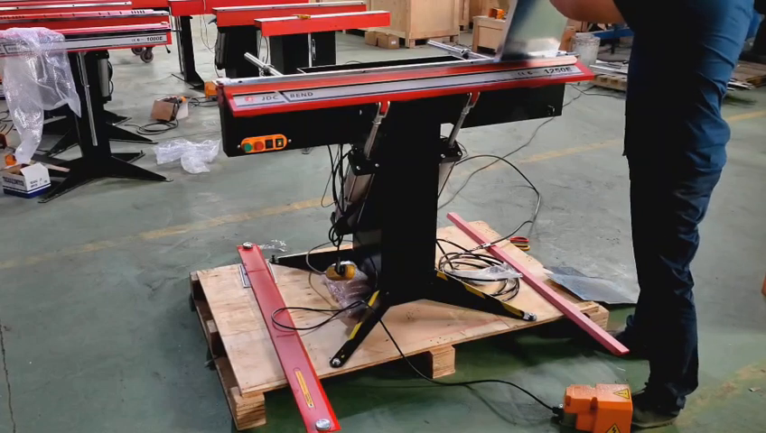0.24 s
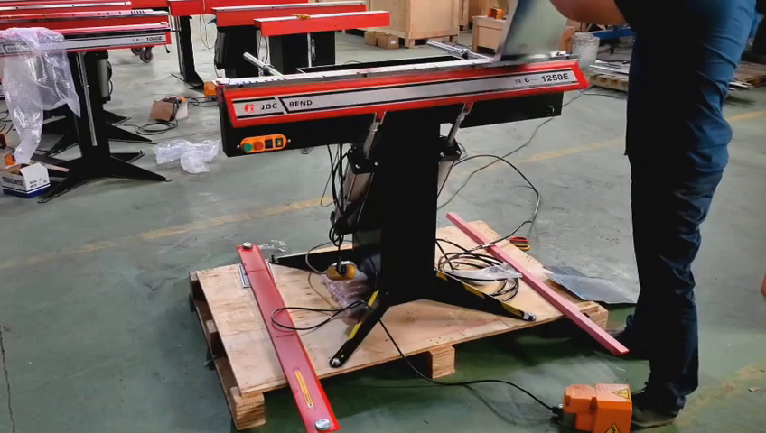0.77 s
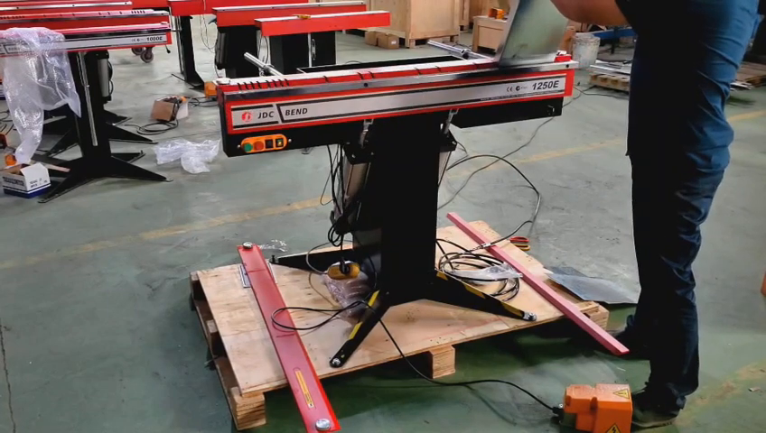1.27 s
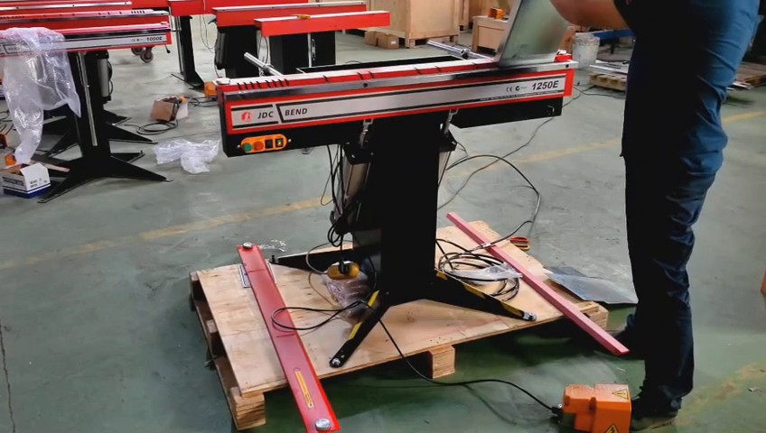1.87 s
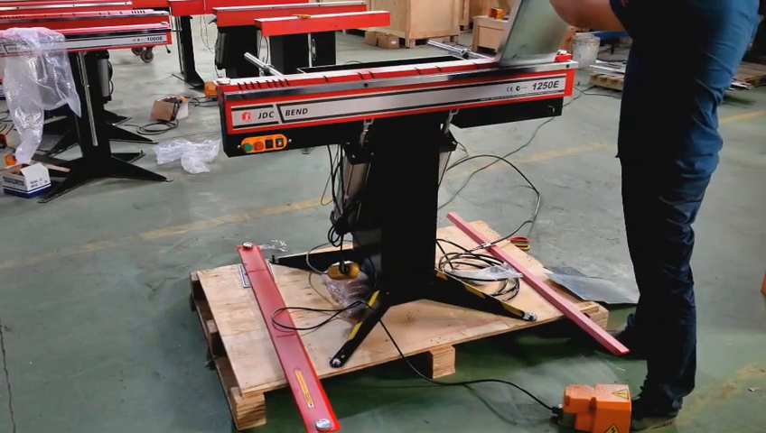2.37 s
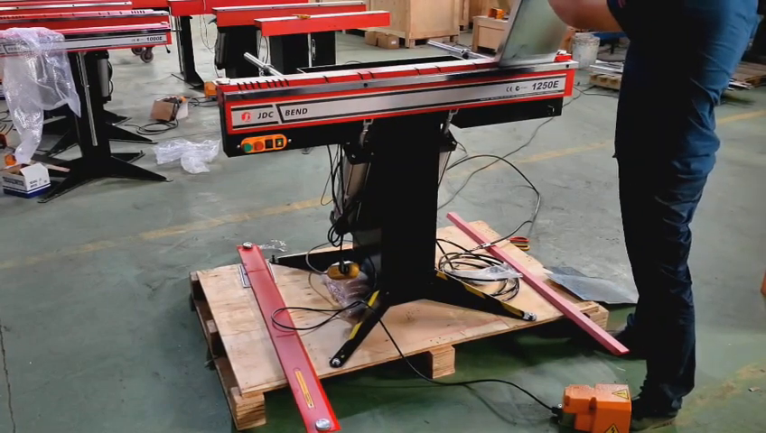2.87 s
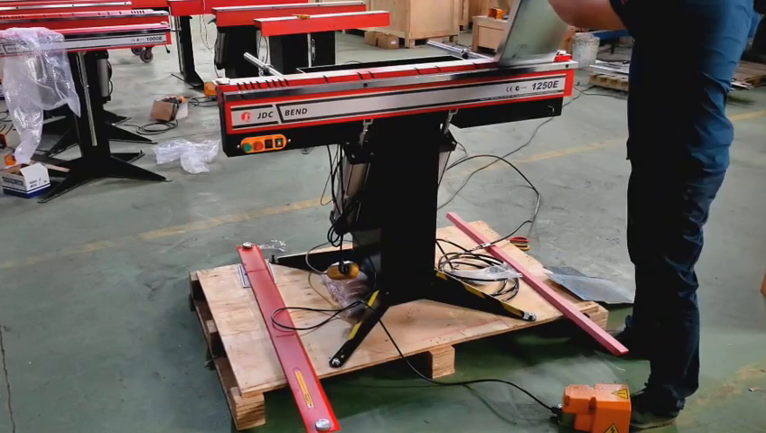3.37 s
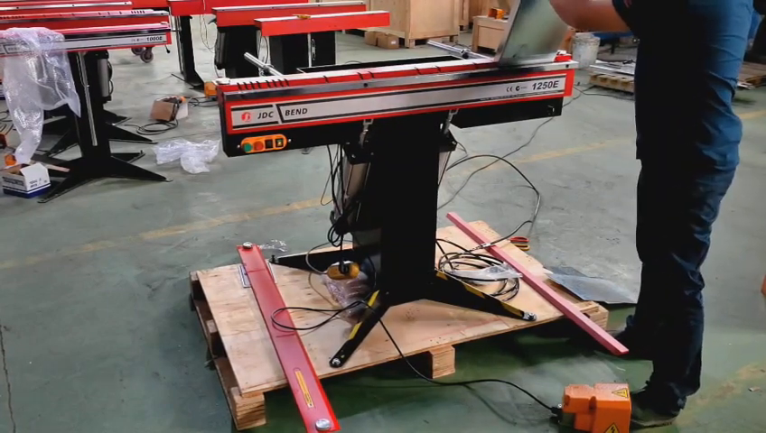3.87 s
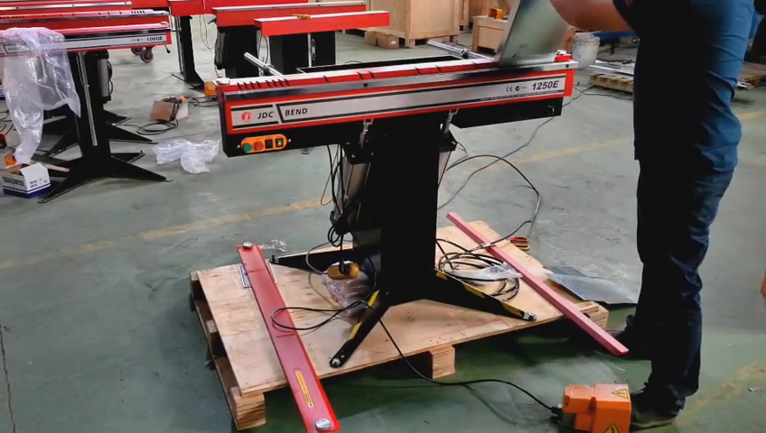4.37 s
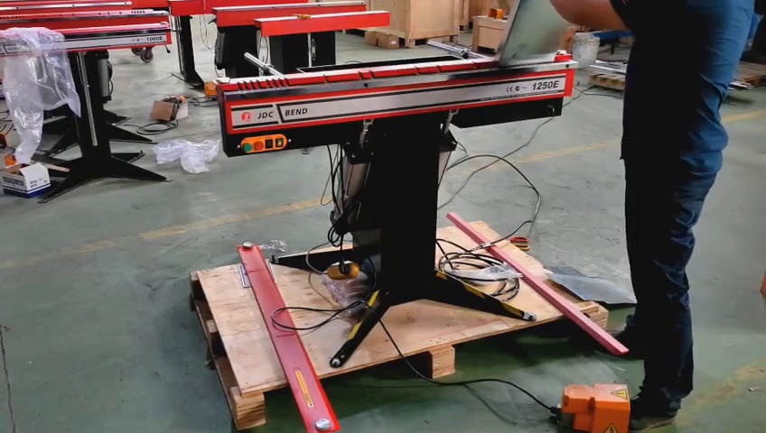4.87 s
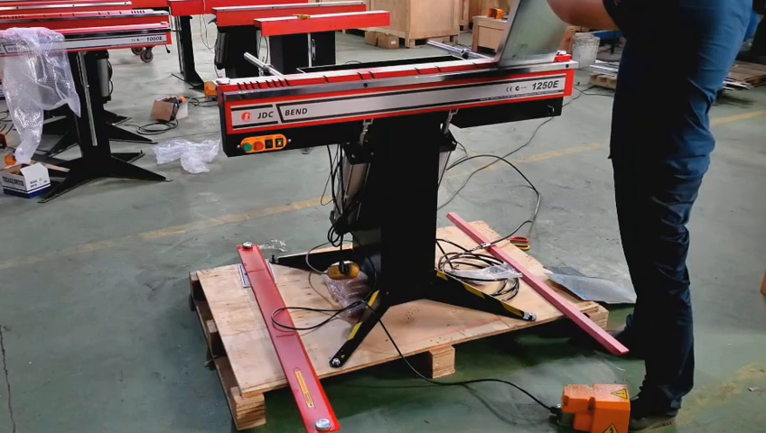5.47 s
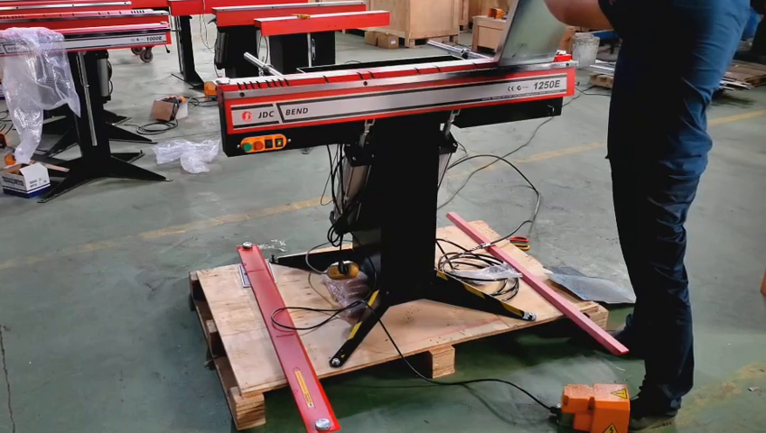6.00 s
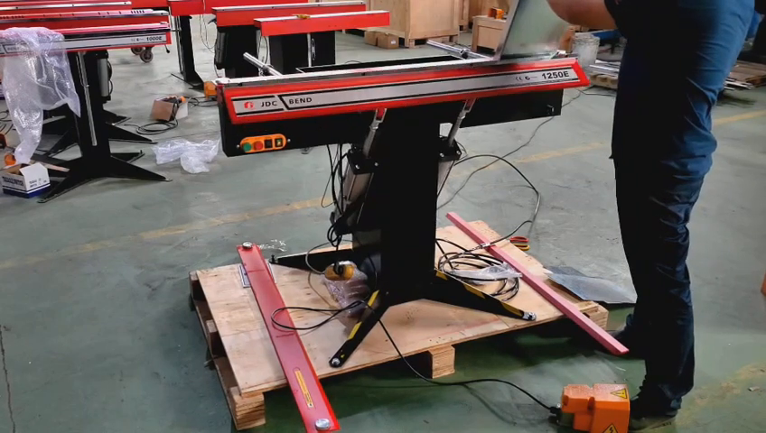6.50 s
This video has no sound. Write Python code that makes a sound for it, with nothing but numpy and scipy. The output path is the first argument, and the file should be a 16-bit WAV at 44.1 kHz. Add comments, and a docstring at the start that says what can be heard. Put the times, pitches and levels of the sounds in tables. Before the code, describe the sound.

A pneumatic sheet metal folder in a large factory hall. A thin, high whistle gives way to a strong air blast, ending in a crunching steel clank. A distant machine drones briefly, then a hard clang and click. Later, latches tick, the clamp slams with several ringing knocks, and a weaker air rush fades among low thumps. The microphone hears it from a few metres away, with low hall rumble.

```python
"""Air-driven sheet metal brake

In a factory hall, air rushes out as the folding leaf drops onto its stop; the clamp lifts, the sheet
is shifted, the clamp slams shut, and air rushes again as the leaf swings up. A far machine drones briefly.
Jets, leaks and the hall are shaped noise; hum, drone and valve whistle are wavering sines; struck steel
is a filtered noise burst with decaying modes and the note of the part struck."""
import sys
import numpy as np
from scipy import signal
from scipy.fft import rfft, irfft
from scipy.io import wavfile
from scipy.ndimage import uniform_filter1d

SR = 44100
rng = np.random.default_rng(int(sys.argv[2]) if len(sys.argv) > 2 else 0)


def inscribe(sig):
    """Save sig as 16-bit PCM at rate SR to the path in sys.argv[1].

    A 1-D sig is mono; a 2-D sig holds one channel per row.
    Samples are clipped to [-1, 1] before scaling.
    """
    pcm = np.round(np.clip(np.atleast_2d(sig).T, -1, 1) * 32767)
    wavfile.write(sys.argv[1], SR, pcm.astype(np.int16))


N = 297410  # samples

# Background noise of the hall: f/Hz, relative level/dB per Hz
HALL_NOISE = [(25, -20.5), (50, -1), (75, -6.5), (160, -3), (260, -9.5), (550, -11), (870, -13.5),
              (1300, -25.5), (2300, -29), (5000, -28), (7000, -33.5), (9500, -49), (13000, -53.5)]
# Course of the hall's hiss: t/s, relative level/dB
HISS_COURSE = [(.2, 3.5), (1.7, -3), (2.25, -10), (2.85, -9), (3.1, -12)]
# Hum in the hall: f/Hz, mean level/dB
HUM_TONES = [(49.9, -67.5), (79, -74), (315, -73.5), (555, -90.5)]
# Partials of the far machine: harmonic number, mean level/dB
DRONE_PARTIALS = [(1, -71), (2, -61.5), (3, -60), (4, -71), (6, -79)]
# Colour of air seeping through the valve: f/Hz, relative level/dB per Hz
SEEP_SPECTRUM = [(3000, -35), (9500, -26), (10500, -7), (11400, -3), (12500, -4), (13800, -7.5)]
# Leaks while the valve holds pressure: start t/s, length/s, level/dB, fading/(dB/s), negative if growing
VALVE_LEAKS = [(0, 0.39, -79, -10), (1.103, 0.36, -71, -3), (3.597, 1, -66.5, 11)]
# Spits of the switching valve: t/s, level/dB
VALVE_SPITS = [(1.458, -58), (3.595, -39.5), (4.58, -56)]
# Venting of the cylinder, once a stroke: start t/s, travel/s, flow level/dB, sag in travel/(dB/s),
# release after it/(dB/s), fizz lost/dB per dB of flow lost, port whistle level/dB
VENT_STROKES = [(0.297, 0.69, -29.5, 14.5, 70, 0.6, 9), (5.494, .57, -35.5, 5, 28.5, 0.54, 4)]
# Colour of the exhaust jet: f/Hz, relative level/dB per Hz
JET_SPECTRUM = [(350, -8), (700, -14), (1300, -8.5), (1800, -11.5), (2600, -4.5), (3600, -4), (5000, -5.5),
                (7500, -7), (8200, -12.5), (9700, -15), (11500, -9), (14000, -14.5)]
# Corners of the force spectrum, from thud through body and clank to crack: f/Hz
FORCE_CORNERS = [140, 300, 750, 1150, 1700, 2500]
# Modes of the frame and sheet: f/Hz, relative level/dB, t60/s at a ring length factor of 1
BRAKE_MODES = [(125.8, -11, 0.17), (148.3, 0.5, 0.39), (171.5, -9, 0.73), (252.7, -12, 0.48),
               (303.3, -8, 0.86), (425, -6.5, 0.61), (455, -11.5, 1), (504, -2, 0.68), (688, -2.5, 0.55),
               (793, -3.5, 0.5), (950, -19, 0.1), (1216, -3.5, 0.33), (1321, -2, 0.43), (1460, -4.5, 0.22),
               (1590, -5.5, 0.15)]
# Dense rattle between those modes: f/Hz, relative level/dB per Hz
RATTLE_SPECTRUM = [(50, -26), (85, -22.5), (135, -6.5), (220, -7.5), (450, -7.5), (900, -7.5), (1450, -11),
                   (1950, -21.5), (2600, -17.5), (4200, -19.5), (7200, -29), (9600, -38.5), (11300, -28.5),
                   (14000, -52.5)]
# Bright resonances of the clamp bar: f/Hz, width/Hz, level/dB above the rattle
CLAMP_RESONANCES = [(2260, 150, 5.5), (2664, 32, 5), (3760, 57, 4.5), (4350, 110, 2.5), (7000, 430, 6.5)]
# Decay of the rattle: f/Hz, t60/s at a ring length factor of 1
RATTLE_DECAY = [(120, 0.62), (500, 0.65), (1300, 0.45), (4000, 0.37), (11000, 0.38)]
# Decay of the hall: f/Hz, t60/s
HALL_DECAY = [(120, 1.04), (500, 0.98), (1300, 0.56), (4000, 0.7), (11000, 0.34)]
# Hall under the blow at a ring length factor of 1: f/Hz, relative level/dB
HALL_LEVEL = [(120, 2), (400, -6), (1300, -31.5), (4000, 0.5), (11000, -10)]
# Leaf and clamp slamming on steel: t/s, level/dB, thud/dB, clank/dB, crack/dB,
# note of the part struck f/Hz, its level/dB, ring length factor
STEEL_SLAMS = [ (1.092, -22, 0, 6, -13, 990, 16, 0.44), (1.102, -20.5, -1, -4, -17.5, 308, 12.5, 0.66),
               (1.502, -34.5, 9, -3, -29, 427, 6, 0.53), (3.208, -17.5, 3.5, 3.5, 2, 2580, -1, 0.56),
               (3.243, -18, 0.5, 0, -13.5, 1566, 7.5, 0.61), (4.724, -21.5, 1.5, 8.5, 3.5, 1170, -7, 1),
               (4.806, -19.5, -6.5, 6, 4, 1320, 9, 0.79), (4.813, -12.5, -3.5, -20, -23, 705, 4, 0.89),
               (4.948, -32, 13, -1, 3, 1264, 9.5, 0.96), (5.137, -29.5, -11, 6.5, -3.5, 870, 6.5, 0.42),
               (5.158, -28, -5, 3.5, -34, 497, 10, 0.45)]
# Clicks of latches and levers: t/s, level/dB, crack/dB, note of the part f/Hz, ring length factor
LATCH_CLICKS = [(1.458, -28.5, -9, 1390, 0.52), (3.159, -35, -9, 787, 1.5), (3.606, -33, -3.5, 810, 0.5),
                (4.469, -31.5, -4, 657, 0.42), (4.504, -32.5, -6, 1310, 0.31), (4.572, -37, -2, 1560, 0.42),
                (4.612, -39.5, -22, 1390, 0.47)]
# Frame rocking on its pallet: t/s, level/dB, note of the frame f/Hz, its level/dB, ring length factor
FRAME_THUMPS = [(0.453, -26, 385, -25, 1), (1.155, -32.5, 265.7, 1, 5.6), (1.333, -41.5, 304, 10.5, 2),
                (3.219, -16.5, 413.6, -3.5, 1.3), (4.762, -19.5, 157.7, 11.5, 0.37),
                (5.016, -27.5, 183, 3, 1.32), (5.083, -22.5, 162.3, 0, 0.77), (5.772, -20, 183, -1, 0.37),
                (5.865, -32, 228.3, -2.5, 0.88), (6.116, -33, 122, 0, 0.3), (6.342, -37, 188, -6.5, 0.48),
                (6.393, -45.5, 108, 5.5, 0.52)]
# Steel grinding as the leaf meets its stop or takes up the sheet:
# t/s, level/dB, clank/dB, crack/dB, note f/Hz, its level/dB
STEEL_CRUNCHES = [(1.080, -23.5, 2, -8.5, 798, 12.5), (5.748, -27.5, 1.5, 7.5, 1176, 4)]


def amp(db):
    """Decibels to amplitude: a factor of ten for every 20 dB."""
    return 10 ** (np.asarray(db) / 20)


def evened(x):
    """Normalisation to an rms of one."""
    return x / np.sqrt(np.mean(abs(x) ** 2) + 1e-20)


def read(points, hz):
    """Interpolation of a table on a log-frequency axis."""
    f, value = np.transpose(points)
    return np.interp(np.log(hz + 1), np.log(f + 1), value)


def add(mix, s, sound):
    """Superposition of a sound onto the mix at time s."""
    part = mix[round(s * SR):][:len(sound)]
    part += sound[:len(part)]


def noise(colour):
    """Spectral shaping: steady noise filtered to a given colour."""
    white = rfft(rng.standard_normal(N))
    return evened(irfft(white * amp(read(colour, np.fft.rfftfreq(N, 1 / SR))), N))


def wander(per_s):
    """Slow random variation: unit normal values at a given rate, joined by straight lines."""
    knots = np.arange(N) / SR * per_s
    return np.interp(knots, np.arange(4000), rng.standard_normal(4000))


def frames():
    """Short-time analysis grid: times (a column) and frequencies."""
    return np.arange(N // 256 + 5)[:, None] * 256 / SR, np.fft.rfftfreq(1024, 1 / SR)


def patches(shape, time_frames, bins):
    """Correlated randomness: a unit field smoothed over time and frequency."""
    field = uniform_filter1d(rng.standard_normal(shape), size=time_frames, axis=0)
    return evened(uniform_filter1d(field, size=bins, axis=1))


def moving_noise(gain):
    """Time-varying filtering: noise whose spectrum follows a frames x bins field of gains."""
    z = gain * (rng.standard_normal(gain.shape) + 1j * rng.standard_normal(gain.shape))
    return signal.istft(z.T, nperseg=1024, noverlap=768)[1][:N] / np.sqrt(512 * 2 / 3)


def factory(base_db=-55, rumble_db=-3.0, patchy_db=0.9):
    """Diffuse background: the hall's patchy broadband rumble and hiss, with hum of wavering level and phase."""
    t, hz = frames()
    hiss_db = np.interp(t, *np.transpose(HISS_COURSE))
    high = hz / (hz + 1500)  # share of hiss, rising with frequency
    # the patches are deeper in the bass
    patch_db = (3 - high) * patchy_db * patches((len(t), len(hz)), 16, 8)
    level_db = base_db + (1 - high) * rumble_db + high * hiss_db + patch_db
    gain = evened(amp(read(HALL_NOISE, hz))) * amp(level_db)
    time = np.arange(N) / SR
    hum = sum(amp(db + 2 * wander(1.7)) * np.sin(2 * np.pi * f * time + wander(4.5)) for f, db in HUM_TONES)
    return moving_noise(gain) + np.sqrt(2) * hum


def drone(base_hz=216.5, start_s=1.925, swell_s=0.22, stop_s=2.48, fade_s=0.043):
    """Harmonic series: a far machine drones for half a second and dies away exponentially."""
    t = np.arange(N) / SR
    level = np.clip((t - start_s) / swell_s, 0, 1) * np.exp(-np.maximum(t - stop_s, 0) / fade_s)
    partials = sum(amp(db + wander(7.15)) * np.sin(2 * np.pi * round(k) * base_hz * t)
                   for k, db in DRONE_PARTIALS)
    return np.sqrt(2) * level * partials


def seep(hold_s=0.018, fade_s=0.028, shut_s=.06, idle_db=-84):
    """Leakage noise: the valve spits as it switches, leaks while it holds pressure, and seeps faintly throughout."""
    t = np.arange(N) / SR

    def gate(start, length, fade):
        return (t >= start) * np.exp(-np.maximum(t - start - length, 0) / fade)

    spits = sum(amp(db) * gate(start, hold_s, fade_s) for start, db in VALVE_SPITS)
    leaks = sum(gate(start, length, shut_s) * amp(db - fading * np.maximum(t - start, 0))
                for start, length, db, fading in VALVE_LEAKS)
    return noise(SEEP_SPECTRUM) * (spits + leaks + amp(idle_db))


def valve(whistle_hz=3565, sag_hz_per_s=230, low_db=-76, high_db=-60, waver=0.0025):
    """Flow whistle: a sinking tone and its octave last until the first stroke lets the pressure go."""
    t = np.arange(N) / SR
    hz = (whistle_hz - sag_hz_per_s * t) * (1 + waver * wander(370) + 0.003 * wander(12))
    phase = 2 * np.pi * np.cumsum(hz) / SR
    held = np.clip((VENT_STROKES[0][0] - t) / 0.0051, 0, 1) * amp(-18 * t + 4.3 * wander(37.3))
    whistle = held * (amp(low_db) * np.sin(phase) + amp(high_db) * np.sin(2 * phase))
    return np.sqrt(2) * whistle


def puffs(puff_db=-39, puff_hz=88, fade_s=0.036):
    """Volume displacement: the first gush of each stroke gives a soft, decaying low push."""
    t, out = np.arange(SR // 2) / SR, np.zeros(N)
    for stroke in VENT_STROKES:
        add(out, stroke[0], amp(puff_db) * np.sin(2 * np.pi * puff_hz * t) * np.exp(-t / fade_s))
    return out


def exhaust(fizz_db=5.0, port_empty_hz=3640, port_rise_hz=580, pressure_scale_db=4,
            port_width_hz=190, blur_hz=300, flutter_db=0.47, ripple_db=3.5, patchy_db=1.0,
            open_s=0.018, build_s=.022, early_db=-5, linger_db=-21, linger_db_per_s=36):
    """Jet turbulence: the flow sags in travel, then runs out and dulls; a random ripple roughens its colour."""
    t, hz = frames()
    top = np.clip((hz - 7000) / 1500, 0, 1)  # share of fizz
    time, out = np.arange(N) / SR, np.zeros(N)
    for start, travel, db, sag, release, dulling, port_db in VENT_STROKES:
        age, after = np.maximum(t - start, 0), np.maximum(t - start - travel, 0)
        lost_db = np.minimum(sag * age + release * after, 100)
        # relative pressure falls from 2 towards 0; the port's fuzzy whistle sinks and narrows with it
        pressure = 1 / (0.5 + (lost_db / pressure_scale_db) ** 4)
        port_hz = port_empty_hz + port_rise_hz * pressure
        port = port_db / (1 + ((hz - port_hz) / (port_width_hz + blur_hz * pressure)) ** 2)
        # a random ripple, fixed through each stroke, and moving eddies roughen the colour
        ripple = ripple_db * rng.standard_normal(len(hz))
        eddies = patchy_db * patches(port.shape, 14, 3)
        fizz = top * (fizz_db - dulling * lost_db)
        gain = amp(read(JET_SPECTRUM, hz) + ripple + eddies + fizz + port) * hz / np.hypot(hz, 120)
        # the power from 2 to 8 kHz sets the level
        middle = (hz > 2000) & (hz < 8000)
        gain /= np.sqrt(np.mean(gain ** 2 * middle, axis=1, keepdims=True))
        # the fizz starts nearer its full level than the rest
        filling = amp((1.5 - top) * early_db * np.exp(-age / build_s))
        # a weaker tail fades at its own rate
        tail_db = linger_db - sag * age - linger_db_per_s * after
        flow = np.hypot(amp(-lost_db), amp(tail_db))
        opening = np.clip((time - start) / open_s, 0, 1)
        out += amp(db) * moving_noise(gain * filling * flow) * opening
    return out * amp(flutter_db * wander(70))


# Each contact: t/s, level/dB, (thud, body, clank, crack)/dB, rise/s, note f/Hz, its level/dB, ring length factor

def valve_knocks(db=-37.5, thud_db=-4, clank_db=8, crack_db=-3, rise_s=0.0049,
                 note_hz=1365, note_db=-1, ring=0.6):
    """Impact of the valve: it knocks open at the start of each stroke."""
    return [(stroke[0], db, (thud_db, 0, clank_db, crack_db), rise_s, note_hz, note_db, ring)
            for stroke in VENT_STROKES]


def clicks(thud_db=-20, body_db=-11.5, note_db=0, rise_s=.0007):
    """Impact of light parts: little thud or body, mainly clank."""
    return [(s, db, (thud_db, body_db, 0, crack), rise_s, hz, note_db, ring)
            for s, db, crack, hz, ring in LATCH_CLICKS]


def thumps(body_db=-8.5, clank_db=-18, crack_db=-24, rise_s=.004):
    """Compliant contact: soft, heavy blows wake mainly the bass of the frame."""
    return [(s, db, (0, body_db, clank_db, crack_db), rise_s, hz, note_db, ring)
            for s, db, hz, note_db, ring in FRAME_THUMPS]


def crunches(thud_db=-6, rise_s=0.0076, ring=0.72):
    """Sliding friction: grinding contacts build slowly."""
    return [(s, db, (thud_db, 0, clank, crack), rise_s, hz, note_db, ring)
            for s, db, clank, crack, hz, note_db in STEEL_CRUNCHES]


def slams(rise_s=0.00053, softening=.35, slowing=0.42, full_db=-20):
    """Contact time of steel on steel: the weaker the blow and the less its crack, the more slowly it builds."""
    contacts = []
    for s, db, thud, clank, crack, hz, note_db, ring in STEEL_SLAMS:
        rise = rise_s * amp(slowing * (full_db - db) - softening * crack)
        contacts.append((s, db, (thud, 0, clank, crack), rise, hz, note_db, ring))
    return contacts


def blows(ring_db=-9, rattle_db=-2, snap_db=5, snap_s=0.0034, bass_lag_s=0.0058, part_cycles=60,
          crowd_db=4.2, chatter_db=3.2):
    """Modal excitation: a blow gives a snap, a rattle lingering in the hall, the part's note and the frame's modes."""
    size = 65536
    t, hz = np.arange(size) / SR, np.fft.rfftfreq(size, 1 / SR)
    centres = np.geomspace(100, 12800, 8)
    split = np.array([read(list(zip(centres, row)), hz) for row in np.eye(len(centres))])
    band = centres[:, None]
    mode_hz, mode_db, mode_t60 = np.transpose(BRAKE_MODES)

    def dying(t60):
        return np.exp(-np.log(1000) * t / t60)

    def filling(f):
        # slow bending waves need longer to fill the frame than fast ones
        return 1 - np.exp(-t * f / (bass_lag_s * centres[0]))

    snap = amp(snap_db) * np.exp(-t / snap_s) * band / (band + 3000)
    hall = amp(read(HALL_LEVEL, band)) * dying(read(HALL_DECAY, band))
    mode_waves = np.sin(2 * np.pi * mode_hz[:, None] * t)
    rings = amp(mode_db)[:, None] * filling(mode_hz[:, None]) * mode_waves
    rings[::2] *= -1  # neighbouring modes reach the microphone with opposite signs
    bright = sum(db / (1 + ((hz - f) / width) ** 2) for f, width, db in CLAMP_RESONANCES)
    steel = evened(amp(read(RATTLE_SPECTRUM, hz) + bright))
    fill, out = filling(band), np.zeros(N)
    contacts = slams() + clicks() + thumps() + valve_knocks() + crunches()
    for s, db, (thud, body, clank, crack), rise, part_hz, part_db, length in contacts:
        corners = list(zip(FORCE_CORNERS, (thud, body, body, clank, clank, crack)))
        # each spot wakes its own crowd of high modes, which ripples the spectrum
        crowd = np.interp(hz, np.arange(400) * 70, rng.standard_normal(400)) * hz / (hz + 900)
        force = amp(db + read(corners, hz)) * evened(amp(crowd_db * crowd))
        spectrum = rfft(rng.standard_normal(size)) * steel * force
        decay = dying(length * read(RATTLE_DECAY, band))
        fade = fill * np.sqrt(snap ** 2 + decay ** 2 + (length * hall) ** 2)
        # loose parts chatter, breaking the early treble into clumps
        clumps = evened(amp(chatter_db * wander(450)[:size])) - 1
        chatter = 1 + clumps * np.exp(-t / .12) * band / (band + 900)
        rattle = (irfft(split * spectrum) * fade * chatter).sum(0)
        mode_force = amp(db + read(corners, mode_hz))[:, None]
        ring = (mode_force * rings * dying(length * mode_t60[:, None])).sum(0)
        # at a ring length factor of 1 the note falls 60 dB in part_cycles periods
        note = amp(db + part_db) * np.sin(2 * np.pi * part_hz * t) * dying(length * part_cycles / part_hz)
        blow = amp(rattle_db) * rattle + amp(ring_db) * ring + note
        add(out, s, blow * (1 - np.exp(-t / rise)))
    return out


def scene():
    """Superposition: the sum of all sources reaches both channels alike."""
    background = factory() + drone()
    air = seep() + valve() + puffs() + exhaust()
    return np.tile(background + air + blows(), (2, 1))


def record(dry, bass_hz=36, edge_hz=14150):
    """Band limitation: the microphone drops the deepest bass, then a linear-phase low-pass ends the treble."""
    thinned = signal.sosfilt(signal.butter(4, bass_hz, "highpass", fs=SR, output="sos"), dry)
    lowpass = signal.firwin(801, edge_hz, window=("kaiser", 8), fs=SR)
    return signal.oaconvolve(thinned, lowpass[None], "same")


dry = scene()
out = record(dry)
inscribe(out)
```